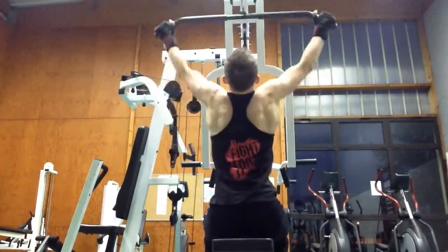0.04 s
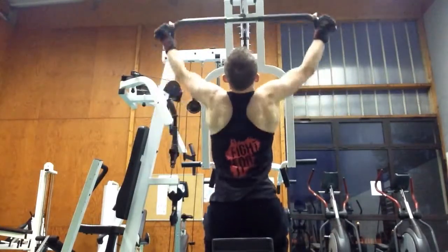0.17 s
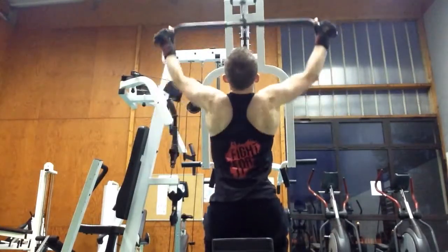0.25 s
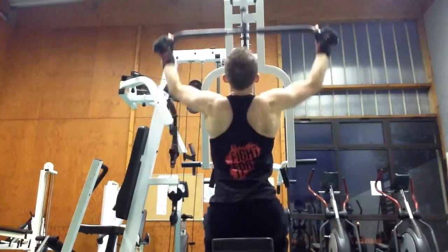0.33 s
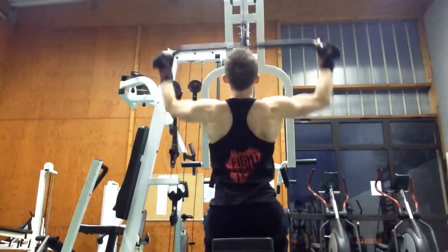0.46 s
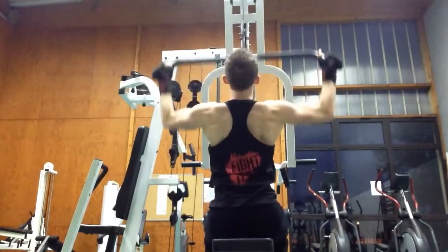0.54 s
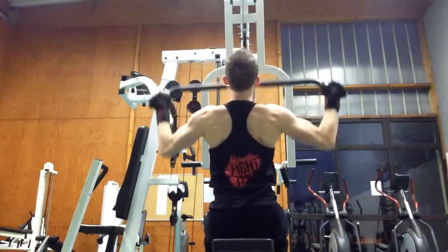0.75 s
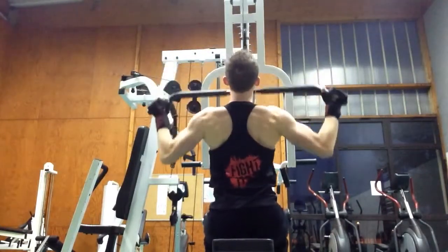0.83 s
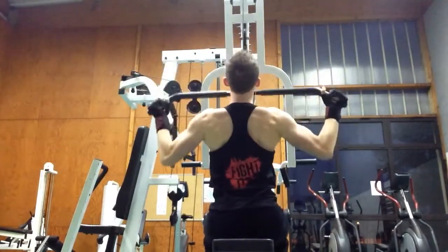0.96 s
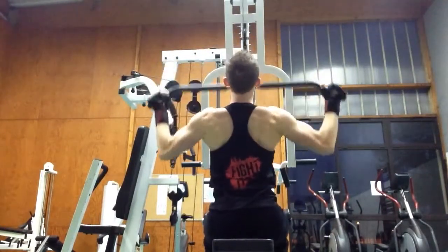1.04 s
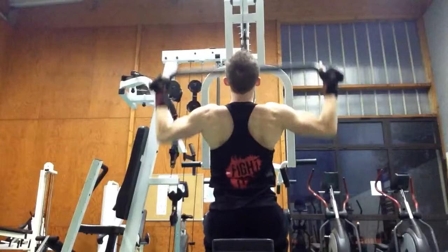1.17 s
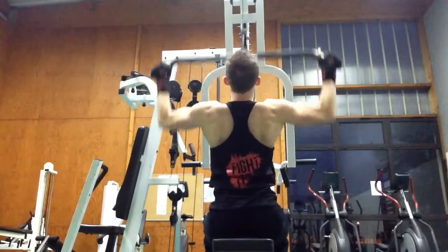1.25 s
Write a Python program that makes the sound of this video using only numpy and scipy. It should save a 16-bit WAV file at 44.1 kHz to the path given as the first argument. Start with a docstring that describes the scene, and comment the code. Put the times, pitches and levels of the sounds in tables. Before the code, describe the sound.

Two sharp metal clanks of weight plates as a cable bar is pulled in a gym.

```python
"""A large, hard-walled gym: a bar is pulled on a cable and the steel weight stack clashes twice.
Each clash is a quick run of plate contacts: a light tick, the main blow, then settling.
The frame thuds and rings; the walls return slaps and a diffuse tail.
The moving cable and guides hiss faintly over a low room rumble."""
import sys
import numpy as np
from scipy import signal
from scipy.fft import rfft, irfft
from scipy.io import wavfile
from scipy.ndimage import uniform_filter1d

SR = 44100
rng = np.random.default_rng(int(sys.argv[2]) if len(sys.argv) > 2 else 0)


def pcm_store(signal):
    """Save signal as 16-bit PCM."""
    levels = np.round(np.clip(np.atleast_2d(signal), -1, 1) * 32767)
    wavfile.write(sys.argv[1], SR, levels.astype(np.int16).T)


N = 57330
TIME_S = np.arange(N) / SR
BINS_HZ = np.arange(N // 2 + 1) * SR / N
EDGES_HZ = 25 * 2 ** (np.arange(29) / 3)
CENTRES_HZ = np.sqrt(EDGES_HZ[1:] * EDGES_HZ[:-1])


# plate contacts: t/s, clack level/dB, clack tilt/(dB/oct), knock level/dB
CONTACTS = [(0.2101, -17, 4.7, -50), (0.2149, -11, 4.5, -31), (0.2165, -3.5, -0.5, -11.5),
            (.2174, 0.5, -0.5, 0), (.2200, -3, 0, -9.5), (0.2274, -9.5, 1, -11), (.2300, -2, -3, -19),
            (0.6192, -17.5, 5, -45), (0.6218, -6, 2.6, -14.5), (0.6245, -1.5, -1, -5.5),
            (.6275, -3.5, 1.8, -26), (0.6316, -6, -1.2, -16), (0.6343, -7, -2.5, -11)]
# damped stack modes: f/Hz, level/dB, t60/s
KNOCK_MODES = [(451, -24.5, 0.033), (546, -18.5, .014), (733, -17.5, .012), (939, -21.5, 0.041),
               (1530, -29, 0.023), (4760, -37, 0.063), (9400, -38, 0.042), (11600, -35.5, 0.031)]

def plates(steel, clack_t60_s=0.05, low_hz=254):
    """Each contact gives a bright clack and a knock of the whole stack."""
    knock = butterworth(sum(ring(*mode) for mode in KNOCK_MODES), 2, low_hz, "high")
    out = 0
    for t_s, clack_db, tilt_db_oct, knock_db in CONTACTS:
        contact = clack(clack_db, tilt_db_oct, clack_t60_s, steel) + from_db(knock_db) * knock
        out += delayed(contact, t_s)
    return out


# plate-on-plate spectrum: f/Hz, density level/dB
CLACK_SPECTRUM = [(30, -50), (60, -34), (110, -23.5), (180, -16), (380, -11), (650, -17.5), (950, -11),
                  (1700, -22.5), (3100, -16.5), (5500, -33.5), (8200, -35), (11500, -39.5), (13500, -39),
                  (15000, -48)]

def clack(level_db, tilt_db_oct, t60_s, steel):
    """One contact excites a crowd of short-lived plate modes: a noise burst."""
    band_db = per_band(CLACK_SPECTRUM) + level_db + tilt_db_oct * np.log2(CENTRES_HZ / 1000)
    return noise(band_db, steel) * decay(t60_s)


def steel_resonances(depth_db=4, spacing_hz=75.2):
    """Close-set steel modes make the spectrum ragged: a gain per bin, unit mean power."""
    heights = rng.standard_normal(4000)
    gain = from_db(depth_db * np.interp(BINS_HZ / spacing_hz, np.arange(len(heights)), heights))
    return gain / np.sqrt(uniform_filter1d(gain ** 2, size=300))


# tap modes: f/Hz, level/dB, t60/s
TAP_MODES = [(188, -49, 0.13), (422, -40.5, 0.036), (562, -52, 0.06)]

def slack_tap(steel, t_s=0.1925):
    """A dull tap as the slack is taken up, just before the first clash."""
    burst = clack(level_db=-22.5, tilt_db_oct=-1.5, t60_s=0.24, steel=steel)
    return delayed(burst + sum(ring(*mode) for mode in TAP_MODES), t_s)


# clashes and their frame thuds: t/s, f/Hz, level/dB, lag/s, t60/s
CLASHES = [(.2160, 171, -17.5, 0.00071, 0.037), (0.6229, 289, -17.5, 0.0068, 0.025)]
# frame modes: f/Hz, clash 1 level/dB, clash 2 level/dB, t60/s
FRAME_MODES = [(160, -41, -49.5, 1.68), (200.5, -35, -40, 0.62), (251.6, -47.5, -40.5, 0.95),
               (330.6, -51, -49, .85), (361.2, -35, -48, 0.58), (504, -38.5, -44, 0.6),
               (540, -39.5, -47, 0.59), (770, -44.5, -47, .5), (937, -39.5, -52, 0.47),
               (931, -36, -39, 0.49), (1029, -47.5, -41.5, 1.01), (1077, -45.5, -42.5, 0.85),
               (1142, -38, -63, 0.24), (1233, -40, -59, 0.58), (1397, -39, -48, 0.29),
               (1557, -51, -63, 0.41), (1691, -53, -51, 1.26), (1782, -45, -47.5, 0.65),
               (2356, -48.5, -66, 0.54), (2783, -47.5, -52, 0.6), (3217, -57, -50.5, .7),
               (3805, -47, -50.5, 0.55)]

def frame(low_hz=80, scatter_s=0.012):
    """The frame thuds at each clash and rings on; it radiates little deep bass."""
    out = 0
    for clash, (t_s, thud_hz, thud_db, lag_s, thud_t60_s) in enumerate(CLASHES):
        modes = 0
        for f_hz, *levels_db, t60_s in FRAME_MODES:
            polarity = rng.choice([-1, 1])
            modes += polarity * delayed(ring(f_hz, levels_db[clash], t60_s), rng.uniform(0, scatter_s))
        thud = ring(thud_hz, thud_db, thud_t60_s)
        out += delayed(modes, t_s) + delayed(thud, t_s + lag_s)
    return butterworth(out, 3, low_hz, "high")


# wall reflections: t/s, level/dB, tilt/(dB/oct)
SLAPS = [(0.252, -14, 0.5), (.290, -14, 5), (.658, -18, -.3), (.678, -15, -5.5), (0.696, -16, -1),
         (0.708, -17, -3.5)]

def wall_slaps(steel, t60_s=0.064, band_hz=(222, 4300)):
    """The clashes come back off the walls, late and dull."""
    slaps = sum(delayed(clack(level_db, tilt_db_oct, t60_s, steel), t_s)
                for t_s, level_db, tilt_db_oct in SLAPS)
    return butterworth(slaps, 2, band_hz, "band")


# tail spectrum: f/Hz, clash 1 density level/dB, clash 2 density level/dB
TAIL_SPECTRUM = [(30, -57, -60), (60, -25, -42), (101, -24.5, -27), (171, -11, -18.5), (277, -15, -16),
                 (420, -17, -17.5), (605, -23, -30.5), (933, -17, -20), (1570, -24, -26), (2240, -32, -33),
                 (3330, -33, -33.5), (5140, -41, -40), (7900, -46, -41.5), (12000, -45.5, -44.5),
                 (15200, -64, -62)]
# tail decay: f/Hz, t60/s
TAIL_T60 = [(150, 1.21), (350, 0.94), (700, 0.76), (1500, 1.06), (3500, 1.66), (6000, 0.89), (12000, 0.52)]

def hall_tail(steel, delay_s=0.005, build_s=0.0088):
    """Each clash fills the hall with diffuse sound; the top treble dies first."""
    envelopes = decay(per_band(TAIL_T60)[:, None]) * (1 - np.exp(-TIME_S / build_s))
    out = 0
    for clash, (t_s, *_) in enumerate(CLASHES):
        band_db = per_band([(f_hz, levels_db[clash]) for f_hz, *levels_db in TAIL_SPECTRUM])
        tail = from_db(band_db) @ (noise_bands(steel) * envelopes)
        out += delayed(tail, t_s + delay_s)
    return out


# hiss envelope: t/s, level/dB
HISS_ENVELOPE = [(0, -4.5), (.06, -1.5), (.095, 4.5), (.115, -4.5), (.19, -4), (.3, 2), (.58, -22),
                 (.82, -24), (.92, 1), (1.08, 1.5), (1.17, -4.5), (1.23, -8), (1.3, -12)]
# hiss spectrum: f/Hz, density level/dB
HISS_SPECTRUM = [(300, -67), (900, -51.5), (1500, -45), (2300, -61), (4000, -60.5), (6500, -55),
                 (9500, -70.5), (13000, -64), (15000, -73.5)]

def cable_hiss():
    """Cable and guides hiss as they slide."""
    level_db = np.interp(TIME_S, *np.transpose(HISS_ENVELOPE))
    return from_db(level_db) * noise(per_band(HISS_SPECTRUM))


# room noise: f/Hz, density level/dB
RUMBLE_SPECTRUM = [(25, -51), (55, -38), (90, -30), (140, -40.5), (240, -43), (500, -50), (1000, -58.5),
                   (1500, -50), (2500, -57.5), (5000, -62.5), (9000, -75), (15000, -95)]

def room_rumble():
    """Steady low room noise."""
    return noise(per_band(RUMBLE_SPECTRUM))


def ring(f_hz, level_db, t60_s):
    """One struck mode."""
    return from_db(level_db) * np.sin(2 * np.pi * f_hz * TIME_S) * decay(t60_s)


def noise(band_db, colour=1):
    """Noise with the given density level in each band."""
    gain = from_db(np.interp(BINS_HZ, CENTRES_HZ, band_db))
    return irfft(rfft(rng.standard_normal(N)) * gain * colour, N)


def noise_bands(colour):
    """Noise in third-octave bands, one row each."""
    spectrum = colour * rfft(rng.standard_normal(N))
    return np.array([irfft(spectrum * (BINS_HZ >= low_hz) * (BINS_HZ < high_hz), N)
                     for low_hz, high_hz in zip(EDGES_HZ, EDGES_HZ[1:])])


def per_band(points):
    """A frequency table, read at the band centres."""
    f_hz, value = np.transpose(points)
    return np.interp(np.log(CENTRES_HZ), np.log(f_hz), value)


def butterworth(x, order, corner_hz, kind):
    """Causal filter; the tiny offset avoids denormals."""
    return signal.sosfilt(signal.butter(order, corner_hz, kind, fs=SR, output="sos"), x + 1e-18)


def decay(t60_s):
    """Exponential decay from 1."""
    return np.exp(-np.log(1000) * TIME_S / t60_s)


def delayed(x, t_s):
    """x, starting at t_s."""
    return np.interp(TIME_S - t_s, TIME_S, x, left=0)


def from_db(level_db):
    """Decibels to gain."""
    return 10 ** (np.asarray(level_db) / 20)


def scene():
    """Machine, hall and background, mono."""
    steel = steel_resonances()
    machine = slack_tap(steel) + plates(steel) + frame()
    hall = wall_slaps(steel) + hall_tail(steel)
    return (machine + hall + cable_hiss() + room_rumble())[None]


def record(dry):
    """Steep low-pass, 70 dB down from 15.5 kHz."""
    return signal.sosfilt(signal.cheby2(16, 70, 15500, fs=SR, output="sos"), dry)


dry = scene()
out = record(dry)
pcm_store(out)
```